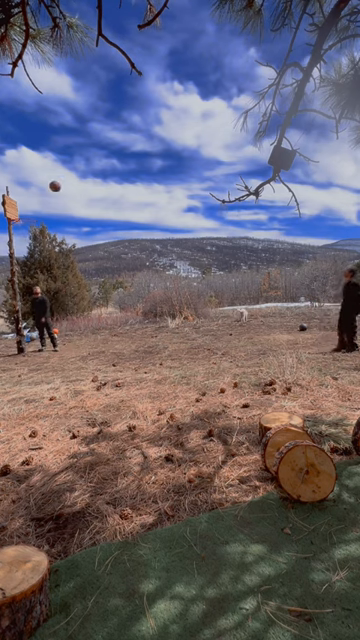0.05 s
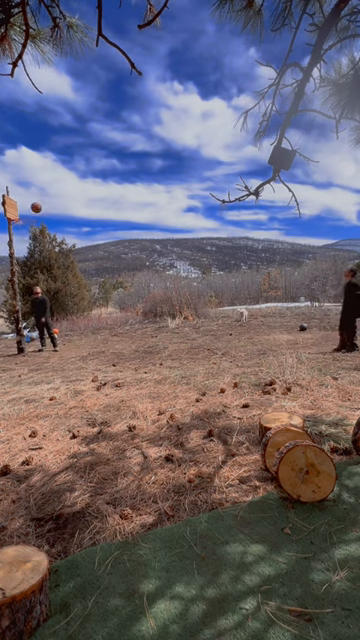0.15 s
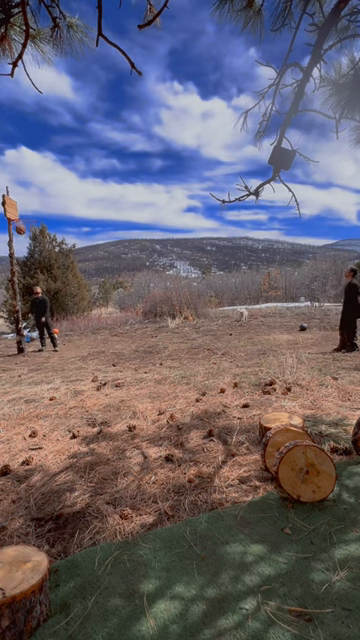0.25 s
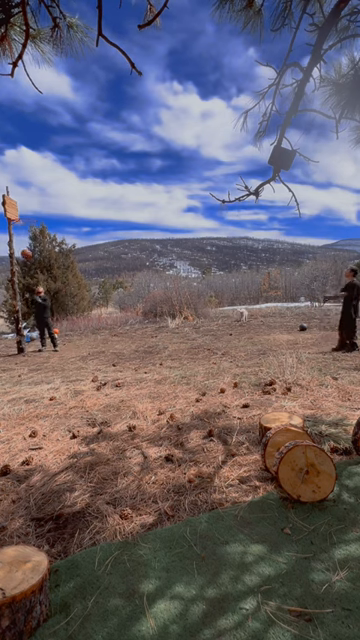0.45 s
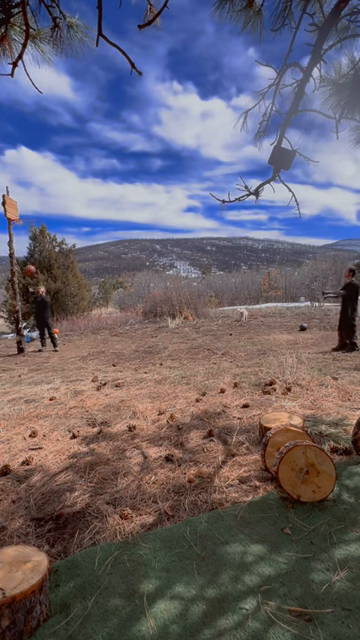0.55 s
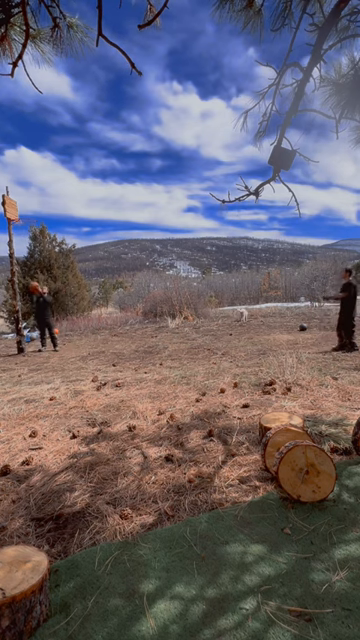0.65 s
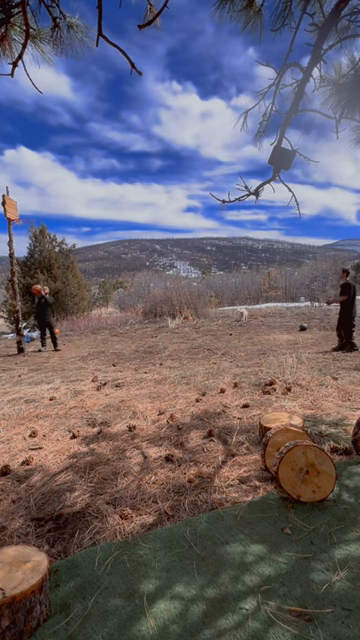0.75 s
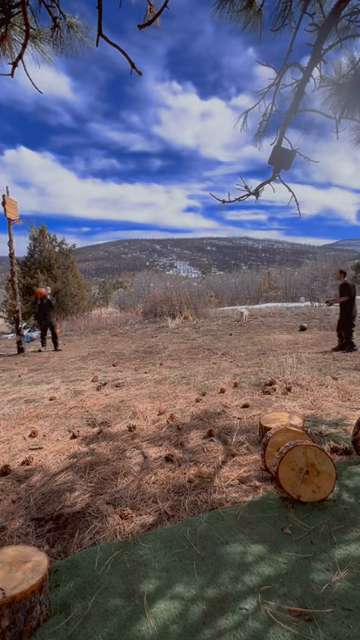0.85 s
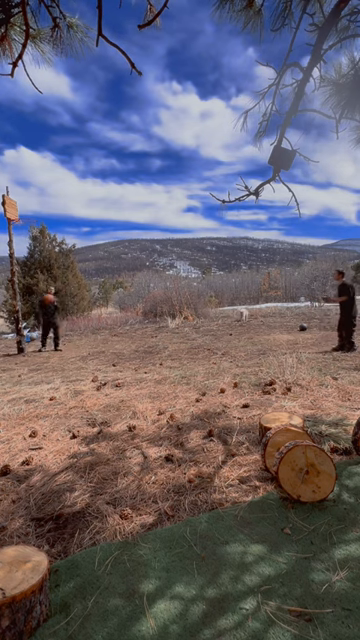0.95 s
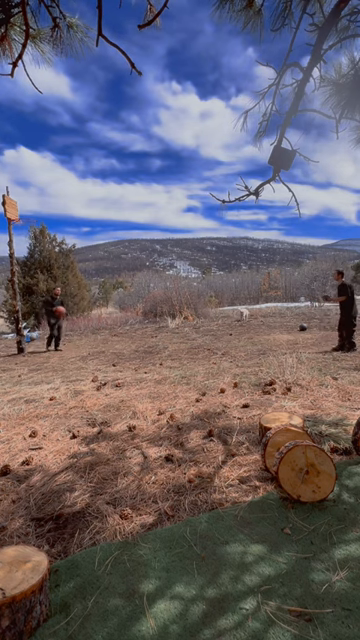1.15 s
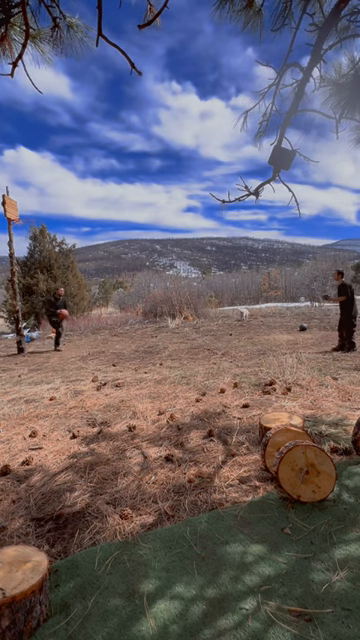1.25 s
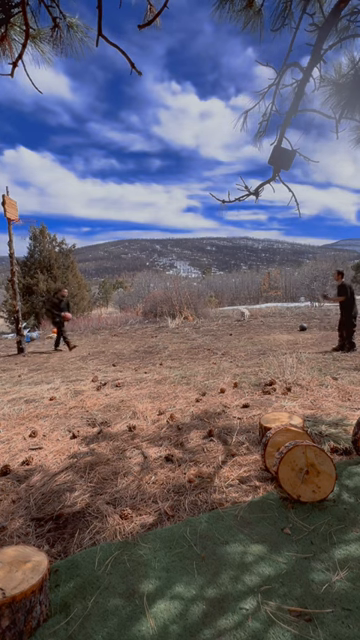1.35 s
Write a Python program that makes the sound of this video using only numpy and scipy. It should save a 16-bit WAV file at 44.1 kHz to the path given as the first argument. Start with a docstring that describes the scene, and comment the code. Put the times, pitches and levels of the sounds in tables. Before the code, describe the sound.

A ball hits a wooden backboard with a quick judder of knocks, a little left of the microphone. A metal chain net clashes and fades to a thin jingle, with a dull catch and two soft steps, outdoors in a low breeze.

```python
"""Light wind blows over an open field. A ball bangs into a wooden backboard on a pole and judders in the
hoop, a quick run of knocks that ring the wood and the rim. It drops through the chain net, which
thrashes in bright surges as link strikes link. The ball is caught with a dull thump between two soft
footfalls; the hoop sings faintly for a moment, and the slack chain swings on with a thin jingle."""
import sys
import numpy as np
from scipy import signal
from scipy.io import wavfile
from scipy.ndimage import uniform_filter1d

SR = 44100
rng = np.random.default_rng(int(sys.argv[2]) if len(sys.argv) > 2 else 0)


def waveform_to_disk(signal):
    """Save audio, clipped to [-1, 1], as 16-bit WAV at the path in sys.argv[1]."""
    frames = np.transpose(np.atleast_2d(signal))
    scaled = np.clip(frames, -1, 1) * 32767
    samples = np.round(scaled).astype(np.int16)
    wavfile.write(sys.argv[1], SR, samples)


N = 61739
T = np.arange(N) / SR
SIDE = np.array([[1], [-1]])  # adds to the left, subtracts from the right

# ball hitting board and hoop: (time [s], level [dB], brightness [dB/octave])
KNOCK_HITS = [(0.218, -34, 6), (0.2205, -31.5, -0.8), (0.2316, -29, 7), (0.2367, -23.5, 2.5),
              (0.2436, -42, 11.5), (0.2467, -22, -3.5), (0.253, -25.5, 2), (0.2583, -36, 3)]
# modes of board and hoop: (frequency [Hz], level [dB], t60 [s])
BOARD_MODES = [(155, -37, 0.46), (375, -12.5, 0.12), (455, -12, 0.072), (544, -3, 0.053),
               (595, -3.5, 0.028), (656, -1.5, 0.054), (811, -15.5, 0.088), (1009, 4, 0.029),
               (1082.6, -5.5, 0.055), (1146, -16, 0.067), (1230, -22.8, 0.24), (1380, -47, 0.019),
               (1580, -13.5, 0.064), (1920, -17.5, 0.012)]
# surges of the net: (time [s], bright clash [dB], lower clatter [dB], t60 [s])
NET_SURGES = [(0.215, -52, -49, 0.41), (0.236, -47, -46.5, 0.16), (0.272, -53, -53, 0.18),
              (0.33, -50, -51.5, 0.31), (0.373, -50, -49.5, .15), (0.444, -57.5, -57, 0.29),
              (0.482, -67.5, -60, 0.74), (0.543, -61.5, -61.5, 0.3), (0.579, -64.5, -59.5, 0.61),
              (0.649, -60, -58, 0.2), (0.729, -70.5, -63, 0.34), (0.771, -77, -64.5, 0.25),
              (0.842, -78.5, -102, 1)]
# colour of the bright clash: (frequency [Hz], level [dB])
CLASH_EQ = [(4000, -3), (5000, -5), (6000, -0.5), (6800, -5.5), (7700, 2), (8800, -1.5), (10500, 1.5),
            (11700, -5)]
# colour of the lower clatter: (frequency [Hz], level [dB])
CLATTER_EQ = [(950, 2.5), (1250, -1), (1600, -6.5), (2100, 1.5), (2450, -7), (2900, -0.5), (3600, -10.5)]
# link modes that ring clear of the clash: (frequency [Hz], level [dB])
CLEAR_TONES = [(5132, -6), (5928, 1.5), (6200, -11), (6980, -3)]
# hard snaps of the chain: (time [s], level [dB], pitch [Hz])
CHAIN_SNAPS = [(0.221, -44, 8240), (0.2344, -43, 6150), (0.2774, -47, 6930), (0.2935, -46, 9500)]
# swings of the slack net: (time [s], level [dB], t60 [s])
NET_SWINGS = [(0.228, -50.5, 0.71), (0.481, -62.5, 1.33), (0.614, -60, 0.43), (0.722, -64.5, 0.24),
              (0.842, -62, 0.84), (0.93, -75, 1.2), (1.089, -63.5, 0.2), (1.249, -75, 3.1)]
# modes of a free link: (frequency [Hz], mid [dB], side [dB])
LINK_MODES = [(6490, -16.5, -34), (9590, -1.5, -3.5), (11670, -5.5, -4), (14200, -25, -1.5)]
# ball landing in the hands: (time [s], thump [dB], slap [dB], ring [dB])
CATCH_HITS = [(0.6365, -69, -70, -48), (0.6437, -60, -57.5, -50.5), (0.6501, -38, -58, -47),
              (0.6569, -39, -41, -46.5), (0.6656, -34, -56, -46)]
# thump against hands and chest: (frequency [Hz], level [dB], t60 [s])
THUMP_MODES = [(82.5, 6, 0.036), (188, 6, 0.029), (350, -6.5, 0.031)]
# air inside the ball: (frequency [Hz], level [dB], t60 [s])
BALL_MODES = [(899, 0, 0.042), (950, 0.5, 0.038), (1270, -5, 0.025), (2090, -13, 0.017)]
# soft steps on turf: (time [s], level [dB])
FOOTFALLS = [(0.598, -57), (1.203, -50)]
# colour of the breeze: (frequency [Hz], relative density [dB])
WIND_EQ = [(25, -25), (36, -11.5), (59, 1.5), (185, -4), (331, -12.5), (466, -6), (505, -9), (939, -14.5),
           (1150, -21.5), (3000, -40.5), (3900, -85)]
# gentle swell of the breeze: (time [s], gain [dB])
WIND_SWELL = [(0, 1.5), (0.17, 0), (0.4, 1.5), (0.8, 1.5), (1.4, .5)]
# colour of the dry grass: (frequency [Hz], relative density [dB])
GRASS_EQ = [(1500, -2.5), (2500, 1.5), (4000, -4.5), (7500, -2), (11500, -7), (13000, -25)]
# stereo image of the air: (frequency [Hz], left-right correlation [0..1])
AIR_CORRELATION = [(40, 0.94), (200, 0.96), (600, 0.17), (1500, 0.063), (8000, 0.77)]


def backboard():
    """Knocks ring board and hoop, the bright ones with a dry crack; near reflections widen the hit."""
    times, db, tilt = np.transpose(KNOCK_HITS)
    body = 0
    for k, (hz, mode_db, t60) in enumerate(BOARD_MODES):
        octaves = np.log2(hz / 750)
        uneven_db = 1.56 * rng.standard_normal(len(times))
        strikes = clicks(times, db + mode_db + tilt * octaves + uneven_db)
        body = body + (-1) ** k * pan(2.5 - 0.5 * octaves) * ring(strikes, hz, t60)
    crack = bursts(times, db + tilt - 21.5, t60=0.027, low_hz=1230, high_hz=2570)
    hit = band(body, 122, 2670) + pan(2.5) * crack
    near = reflections(hit.mean(0, keepdims=True), db=-4, t60=0.04, low_hz=760, high_hz=3700)
    return hit + near[0] * SIDE


def chain_thrash():
    """The ball drags through the net in surges: bright clash, clear tones, lower clatter, hard snaps."""
    top_hz, detune, link_t60 = 12055, 0.0069, 0.047
    surges = [from_db([[high], [low]]) * surge(s, t60) for s, high, low, t60 in NET_SURGES]
    clash_env, clatter_env = np.sqrt(sum(env ** 2 for env in surges))
    clash_hz = np.linspace(3800, top_hz, num=52)
    clash = rattle(clash_hz * rng.normal(1, detune, len(clash_hz)), at_hz(CLASH_EQ, clash_hz), link_t60)
    clash = signal.sosfilt(signal.butter(20, top_hz, fs=SR, output="sos"), clash)
    tones = from_db(-8) * rattle(*np.transpose(CLEAR_TONES), t60=0.1)
    clatter_hz = np.linspace(CLATTER_EQ[0][0], CLATTER_EQ[-1][0], num=16)
    clatter_db = at_hz(CLATTER_EQ, clatter_hz)
    clatter = rattle(clatter_hz * rng.normal(1, detune, len(clatter_hz)), clatter_db, link_t60)
    snaps = sum(bursts([s], [db], t60=0.037, low_hz=hz * 0.96, high_hz=hz * 1.053)
                for s, db, hz in CHAIN_SNAPS)
    return pan(1.4) * (clash_env * (clash + tones) + snaps) + pan(2.5) * clatter_env * clatter


def chain_jingle():
    """Slack links of nearly equal size touch and ring freely with each swing of the net."""
    tunings = 1 + 0.0097 * np.linspace(-1, 1, num=5)
    jingle = 0
    for hz, mid_db, side_db in LINK_MODES:
        links = sum(ring(contacts(per_s=300) * rng.standard_normal((2, N)), hz * tuning, t60=0.035)
                    for tuning in tunings)
        mid, side = band(links, hz * 0.915, hz * 1.085)
        jingle = jingle + from_db(mid_db) * mid + from_db(side_db) * side * SIDE
    swing_env = np.sqrt(sum((from_db(db) * surge(s, t60)) ** 2 for s, db, t60 in NET_SWINGS))
    return swing_env * compress(jingle)


def catch():
    """The ball meets hands and chest with a thump, a slap and a hollow ring; feet thud on the turf."""
    times, thump_db, slap_db, ring_db = np.transpose(CATCH_HITS)
    impacts = clicks(times, thump_db) + clicks(*np.transpose(FOOTFALLS))
    thump = sum(from_db(db) * ring(impacts, hz, t60) for hz, db, t60 in THUMP_MODES)
    thump = band(thump, 56, 2500)
    thump = band(thump, 41, SR / 2)  # trim the sub-bass
    hollow = sum(ring(clicks(times, ring_db + db), hz, t60) for hz, db, t60 in BALL_MODES)
    slap = bursts(times, slap_db, t60=0.027, low_hz=770, high_hz=3430)
    return thump + pan(7) * (hollow + slap)


def hoop_tone():
    """Sliding links keep one faint mode of the hoop singing: it swells, holds and is damped."""
    start_s, end_s, fade_s = 0.7, 0.887, 0.033
    hold = np.clip(np.minimum(T - start_s, end_s - T) / fade_s, 0, 1)
    return pan(2.5) * from_db(-78) * hold * rattle([3280], [0], t60=0.1)


def reflections(x, db, t60, low_hz, high_hz):
    """A diffuse, band-limited tail off the ground and trees."""
    tail = rng.standard_normal((2, N)) * from_db(-60 * T / t60)
    wet = signal.fftconvolve(x, rms_one(tail) / np.sqrt(N), axes=1)[:, :N]
    return from_db(db) * band(wet, low_hz, high_hz)


def wind():
    """The bed: a low rumble of breeze and a faint hiss of dry grass."""
    swell_db = np.interp(T, *np.transpose(WIND_SWELL))
    rumble = from_db(-56 + swell_db) * band(air_noise(WIND_EQ), 41, 8000)
    return rumble + from_db(-84) * air_noise(GRASS_EQ)


def air_noise(spectrum):
    """Half-octave bands of noise, each with its own level and stereo width."""
    air, edges = 0, 20 * 2 ** (np.arange(20) / 2)
    white = rng.standard_normal((2, 2, N))
    for k, (low, high) in enumerate(zip(edges, edges[1:])):
        mid, side = band(white[k % 2], low, high)
        hz = np.sqrt(low * high)
        alike = at_hz(AIR_CORRELATION, hz)
        stereo = np.sqrt(1 + alike) * mid + np.sqrt(1 - alike) * side * SIDE
        air = air + from_db(at_hz(spectrum, hz)) * stereo
    return rms_one(air)


def rattle(pitches, levels_db, t60, width=0.56):
    """Dense contacts ring damped metal modes, spread between left and right."""
    hits, metal = contacts(per_s=1800), 0
    for hz, db in zip(pitches, levels_db):
        mid, side = ring(hits * rng.standard_normal((2, N)), hz, t60)
        metal = metal + from_db(db) * (mid + width * side * SIDE)
    return compress(metal)


def contacts(per_s):
    """Random link-on-link ticks of uneven strength."""
    accent_db = 2 * np.minimum(rng.exponential(1, N), 4)
    ticks = from_db(accent_db) * rng.choice([-1, 1], N)
    return ticks * (rng.random(N) < per_s / SR)


def compress(x):
    """Even out the power of a stereo rattle over 30 ms."""
    power = uniform_filter1d(x.mean(0) ** 2, size=SR // 33)
    return x / np.sqrt(power + .05 * np.mean(x ** 2))


def surge(start_s, t60, attack_s=0.0096):
    """An envelope with a fast attack and a steady decay."""
    attack = np.clip((T - start_s) / attack_s, 0, 1)
    return attack * from_db(-60 * np.maximum(T - start_s - attack_s, 0) / t60)


def bursts(times, db, t60, low_hz, high_hz):
    """A short, dying puff of noise at each contact."""
    decay = signal.lfilter([1], [1, -from_db(-60 / (t60 * SR))], clicks(times, db) + 1e-18)
    return band(decay * rng.standard_normal(N), low_hz, high_hz) * np.sqrt(SR / 2 / (high_hz - low_hz))


def ring(x, hz, t60):
    """A resonator: each click sets off a dying sine."""
    r, w = from_db(-60 / (t60 * SR)), 2 * np.pi * hz / SR
    return signal.lfilter([0, np.sin(w)], [1, -2 * r * np.cos(w), r * r], x + 1e-18)


def clicks(times, db):
    """One impulse per event."""
    return np.bincount((np.asarray(times) * SR).astype(int), from_db(db), N)[:N]


def band(x, low_hz, high_hz):
    """Butterworth band-pass."""
    sos = signal.butter(2, [low_hz, min(high_hz, SR / 2 - 10)], "band", fs=SR, output="sos")
    return signal.sosfilt(sos, x)


def pan(db):
    """Channel gains for a left-minus-right level."""
    return from_db(SIDE * db / 2)


def at_hz(curve, hz):
    """Read a curve on a log-frequency axis."""
    curve_hz, values = np.transpose(curve)
    return np.interp(np.log(hz), np.log(curve_hz), values)


def rms_one(x):
    """Scale to unit power."""
    return x / np.sqrt(np.mean(x ** 2) + 1e-20)


def from_db(db):
    """Decibels to gain."""
    return 10 ** (np.asarray(db) / 20)


def scene():
    """The shot, left of centre, with a light outdoor tail over the wind bed."""
    shot = backboard() + chain_thrash() + hoop_tone() + chain_jingle() + catch()
    return shot + reflections(shot, db=-17.5, t60=0.52, low_hz=200, high_hz=3000) + wind()


def record(dry):
    """A steep high cut on the mix."""
    cutoff_hz = 14750
    return signal.sosfilt(signal.ellip(10, .2, 80, cutoff_hz, fs=SR, output="sos"), dry)


dry = scene()
out = record(dry)
waveform_to_disk(out)
```